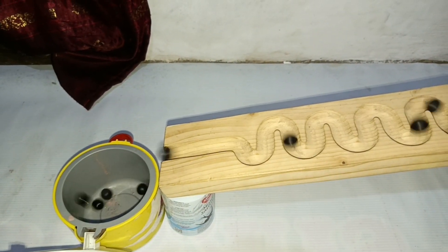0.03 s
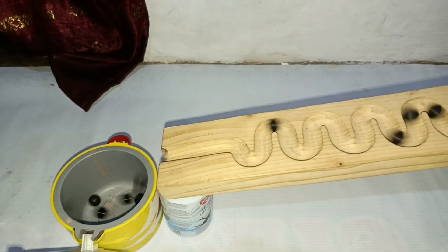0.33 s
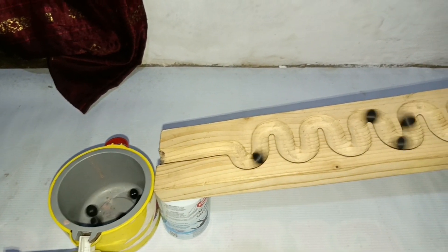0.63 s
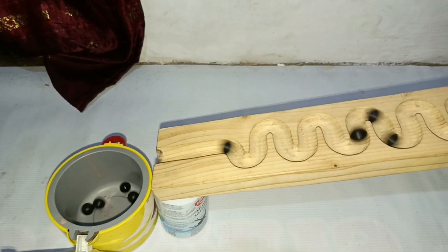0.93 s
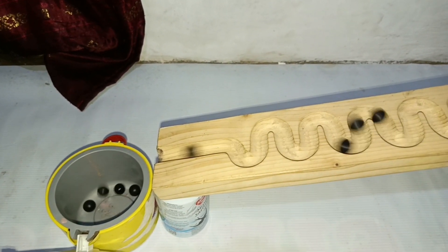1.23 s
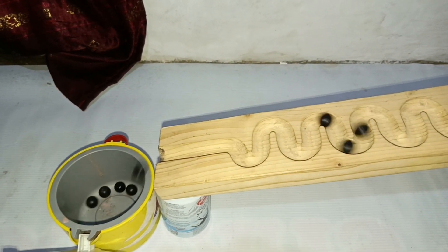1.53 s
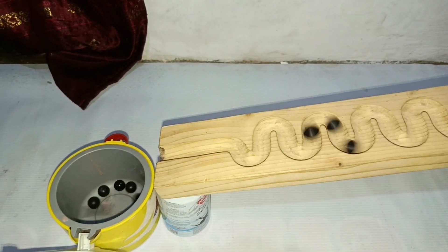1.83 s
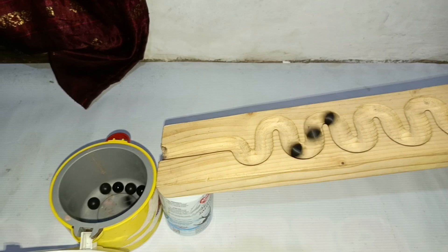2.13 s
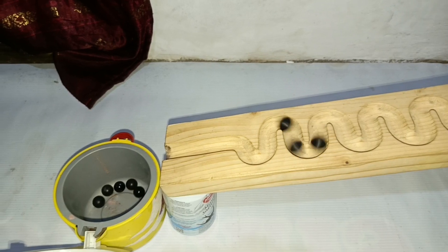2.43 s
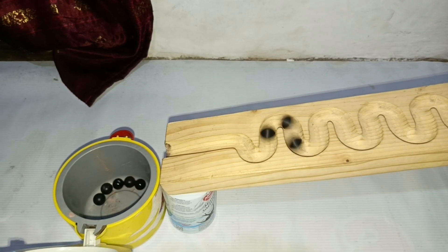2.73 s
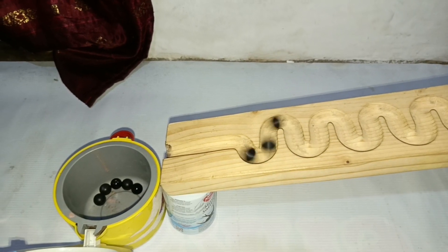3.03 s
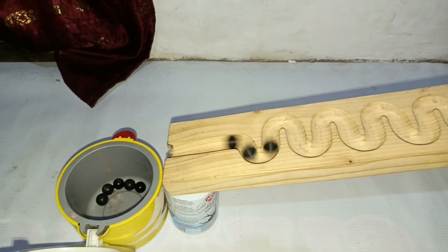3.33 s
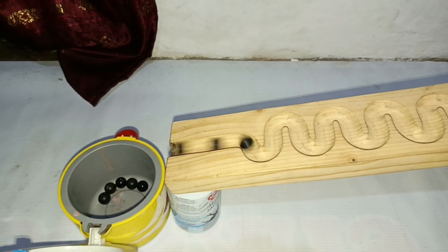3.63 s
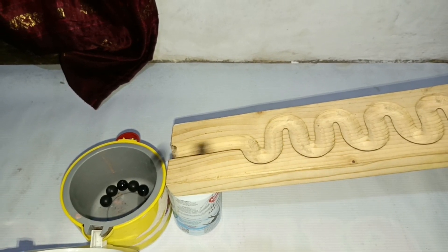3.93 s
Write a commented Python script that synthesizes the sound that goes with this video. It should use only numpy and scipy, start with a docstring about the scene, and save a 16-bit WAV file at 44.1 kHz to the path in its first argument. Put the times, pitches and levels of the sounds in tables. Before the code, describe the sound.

Marbles rumble down a wooden groove and drop into a pot, thumping and clacking.

```python
"""In a small room, glass marbles roll down a winding groove in a wooden board and drop into a pot.
The wood grain shakes them, so the board rumbles, and it knocks when they hit a bend. At each bounce
the pot's base thumps and its wall clacks. The marbles inside circle, rattle and click together.
Near the end, one marble gathers speed on the last straight and whirrs."""
import sys
import numpy as np
from scipy import signal
from scipy.fft import rfft, irfft
from scipy.io import wavfile
from scipy.ndimage import uniform_filter1d

SR = 44100
rng = np.random.default_rng(int(sys.argv[2]) if len(sys.argv) > 2 else 0)


def store_pcm(level_fs):
    """Save levels as 16-bit WAV."""
    pcm = np.round(np.clip(level_fs, -1, 1) * 32767).astype(np.int16)
    wavfile.write(sys.argv[1], SR, np.atleast_2d(pcm).T)


N = 176400
T = np.arange(int(.25 * SR)) / SR  # the clock for one hit, in seconds

# Levels in the tables are relative. A fade_s is the time a sound takes to fall by 60 dB.
# How loudly the marbles roll in the groove: time_s, level_db
GROOVE_LEVELS = [(0, -36), (1.2, -36.5), (1.9, -39), (2.35, -27.5), (2.7, -30), (3.0, -36), (3.75, -34.5),
                 (3.87, -32), (4.0, -33.5)]
# Each new marble stirs up those in the pot, then they settle: time_s, rumble_db, grit_db, fizz_db
CIRCLING_LEVELS = [(0, -19.5, -43.5, -46), (.5, -17, -53, -48.5), (.85, -19, -44, -45),
                   (1.05, -21.5, -50, -72), (1.42, -23, -67.5, -71), (1.53, -23.5, -47.5, -45.5),
                   (1.78, -30, -62, -86), (1.92, -23.5, -53.5, -42.5), (2.2, -14.5, -44.5, -54),
                   (2.42, -25, -57.5, -44.5), (2.6, -33, -53, -66.5), (3.05, -33.5, -71, -79.5),
                   (4.0, -54, -66.5, -70.5)]
# The whirr on the last straight: time_s, level_db
WHIRR_LEVELS = [(3.4, -82.5), (3.8, -54), (3.88, -35.5), (4.0, -51)]
# Brief dips in all the rolling: middle_s, depth_db
ROLLING_DIPS = [(0.154, 16), (0.52, 39), (1.833, 19)]
# Bounces in the pot: start_s, thump_db, clack_db, tick_db
POT_BOUNCES = [(0.059, -33, -21.5, -32.5), (0.1615, 0, -14.5, -31.5), (0.288, -5.5, -16.5, -44),
               (0.328, -6, -16, -34), (0.365, -4, -24, -66.5), (0.402, -11, -18, -38.5),
               (0.469, -9.5, -17.5, -43.5), (0.477, -7.5, -16, -44), (0.529, 1.5, -21.5, -20),
               (0.549, -6, -21, -35.5), (0.643, -23, -26, -44.5), (0.708, 2, -12, -28.5),
               (0.787, -2.5, -31.5, -54), (0.809, -1, -13.5, -28), (0.9673, 6, -12, -37.5),
               (1.021, -10.5, -25, -65.5), (1.036, -15.5, -24.5, -51), (1.211, -14.5, -30, -62),
               (1.231, -7, -25.5, -60.5), (1.335, -2.5, -26, -60), (1.384, -7.5, -32, -53.5),
               (1.422, -12.5, -46, -62.5), (1.547, -9, -24, -51), (1.609, -14.5, -45, -43.5),
               (1.781, -11.5, -29, -69), (1.849, 4, -18.5, -22), (1.898, -12, -22, -35.5),
               (2.006, -19.5, -18, -27.5), (2.03, -1.5, -17, -30.5), (2.102, -4.5, -16.5, -35),
               (2.134, -13.5, -24, -46), (2.181, -5, -22.5, -52), (2.234, -6, -22.5, -54.5),
               (2.265, -13, -31, -60.5), (2.347, -10, -23, -40.5), (2.5348, 1.5, -21, -44.5),
               (2.57, -4, -27.5, -52.5), (2.664, -8, -28, -61), (2.822, -6.5, -23, -54),
               (2.851, -6.5, -42.5, -67.5), (2.946, -4, -27, -67), (2.97, -11.5, -45, -84.5),
               (3.182, -13, -42, -72.5), (3.3671, -5.5, -31, -65), (3.39, -7.5, -31.5, -71),
               (3.441, -9, -32.5, -69)]
# Marble against marble: start_s, level_db
MARBLE_CLICKS = [(0.181, -28), (0.25, -17), (0.4938, -23), (0.869, -24.5), (1.5031, -18.5), (1.59, -24.5),
                 (1.806, -19.5), (2.0052, -22.5), (2.3096, -21.5), (2.346, -16), (2.3964, -25.5),
                 (2.7505, -25), (2.8672, -31.5), (2.916, -30.5)]
# Marble against a bend in the groove: start_s, hum_db, crack_db
BEND_KNOCKS = [(1.132, -32, -22), (1.521, -16.5, -31.5), (2.615, -18, -27.5), (2.72, -22.5, -47.5),
               (3.17, -17, -24), (3.281, -21.5, -48), (3.4805, -18, -26.5), (3.538, -24, -34),
               (3.603, -38, -29), (3.718, -18, -27.5), (3.814, -10.5, -23.5)]

# The tones that ring in the board, the pot's wall and the whirr: pitch_hz, level_db, fade_s
BOARD_TONES = [(420.6, -6, 0.17), (729.1, 1, 0.12), (747.2, 3.5, 0.11), (1147.4, -1.5, 0.074),
               (1197, -11.5, 0.17), (1818, -17.5, 0.05), (2400, -30, 0.21)]
WALL_TONES = [(1072, 7, 0.082), (1220, 5, 0.035), (1591, -5, 0.066), (1788, -5.5, 0.071), (2234, 2, 0.05)]
WHIRR_TONES = [(1110, 9, 0.016), (2010, 9, 0.0057), (3380, -7.5, 0.017), (4170, -12, 0.008)]

# The colour of each noise, or how strong it is from low to high: pitch_hz, level_db
GROOVE_COLOUR = [(90, 10.5), (210, 5), (400, 19), (600, -1), (800, -1), (1250, -10), (1450, -22),
                 (2400, -16.5), (2900, -38.5), (6000, -64.5)]
RUMBLE_COLOUR = [(60, -55.5), (130, -16.5), (200, -7.5), (250, -1), (335, 2.5), (420, -1), (560, -16.5),
                 (900, -22), (1500, -36.5), (3000, -69)]
GRIT_COLOUR = [(400, -16.5), (800, -6.5), (1150, 14.5), (1850, 7.5), (2700, 0), (3200, 1.5), (4000, -7.5),
               (4700, -2.5), (5600, -21.5), (8500, -35)]
FIZZ_COLOUR = [(3000, -4), (4800, -1), (6500, -18.5), (7350, -1.5), (8400, -9)]
ROOM_COLOUR = [(25, -43), (57, 9), (110, 3.5), (200, 7), (1000, -30.5), (15000, -55)]
CLACK_COLOUR = [(90, -22.5), (300, -2), (520, 12), (800, -1.5), (2200, -9.5), (3300, -14), (4200, -20),
                (8500, -42)]
TICK_COLOUR = [(1500, -12), (2600, -9.5), (3300, 3), (4900, -7), (5800, -17.5), (6800, -13), (7500, -3.5),
               (8500, -5.5)]
GLASS_COLOUR = [(1500, -59.5), (2300, -4.5), (3100, 3), (4100, 0.5), (4900, -1.5), (5700, -14.5),
                (6800, -8.5), (7400, 1), (8500, -10)]
CRACK_COLOUR = [(400, 4), (1300, 2), (2450, -13), (2900, -27.5), (6000, -44.5)]


def amp(db):
    """Turns decibels into a number to multiply a sound by."""
    return 10 ** (np.asarray(db) / 20)


def unit(x):
    """Scales a sound to an average power of 1."""
    return x / np.sqrt(np.mean(x ** 2) + 1e-20)


def unit_hit(x):
    """Gives a hit the energy of 10 ms of sound at power 1."""
    return x / np.sqrt(np.sum(x ** 2) / (SR / 100) + 1e-20)


def add(mix, start_s, sound):
    """Mixes a sound in at its start time."""
    part = mix[max(round(start_s * SR), 0):][:len(sound)]
    part += sound[:len(part)]


def colour(x, points):
    """Turns the lows and highs of a sound up or down to follow a colour table."""
    size = 4096
    hz, db = np.transpose(points)
    grid_hz = abs(np.fft.fftfreq(size, 1 / SR)) + 1
    log_gain = np.log(amp(np.interp(np.log(grid_hz), np.log(hz), db)))
    response = np.exp(np.conj(signal.hilbert(log_gain)))  # nothing sounds before its hit
    taps = np.fft.ifft(response).real[:size // 2]
    return signal.fftconvolve(x, taps)[:len(x)]


def level(rows, column=1):
    """A volume curve that glides through one decibel column of a table."""
    rows = np.array(rows)
    return amp(np.interp(np.arange(N) / SR, rows[:, 0], rows[:, column]))


def ring(tones, scatter_db=0, detune=0.018):
    """Fading tones whose strength and exact pitch depend on where the marble lands."""
    out = np.zeros(len(T))
    for hz, db, fade_s in tones:
        fade = amp(db + scatter_db * rng.standard_normal() - 60 * T / fade_s)
        sign = rng.choice([-1, 1])
        pitch_hz = hz * (1 + detune * rng.uniform(-0.91, 1))
        out += fade * sign * np.sin(2 * np.pi * pitch_hz * T)
    return out


def rise(rise_s=0.0011):
    """A quick fade-in for the start of a hit."""
    return 1 - np.exp(-T / rise_s)


def burst(points, fade_s, tail_db=-np.inf, tail_fade_s=np.inf):
    """Many close tones blur into a quick crack of noise, with a weaker tail if asked for."""
    fade = amp(-60 * T / fade_s) + amp(tail_db - 60 * T / tail_fade_s)
    return unit_hit(colour(rng.standard_normal(len(T)) * fade, points))


def bumps(per_s, spread_db):
    """Tiny random hits of marbles on an uneven surface."""
    size = amp(spread_db * np.minimum(rng.exponential(1, N), 4))
    return size * rng.choice([-1, 1], N) * (rng.random(N) < per_s / SR)


def flutter(rate_hz, depth_db):
    """Unsteady contact makes the volume waver at random."""
    slow_noise = rfft(rng.standard_normal(N)) / (1 + (np.fft.rfftfreq(N, 1 / SR) / rate_hz) ** 4)
    return amp(depth_db * unit(irfft(slow_noise, N)))


def board_rolling(rumble_db=2, cutoff_hz=1000):
    """The wood grain shakes the marbles, which drum on the board and make it ring."""
    shaking = bumps(per_s=5200, spread_db=3.5) * flutter(rate_hz=5.7, depth_db=4.5)
    soft_shaking = signal.lfilter(*signal.butter(2, cutoff_hz, fs=SR), shaking)
    ringing = unit(signal.fftconvolve(soft_shaking, ring(BOARD_TONES))[:N])
    rumble = unit(colour(shaking[::-1], GROOVE_COLOUR))  # reversed, so it wavers apart from the ring
    return (ringing + amp(rumble_db) * rumble) * level(GROOVE_LEVELS)


def pot_rolling(grit_db=10, fizz_db=1):
    """Marbles circle on the pot's rough base: a low rumble with grit and fizz on top."""
    sway = flutter(rate_hz=15, depth_db=1.5)
    roll = sway * bumps(per_s=5400, spread_db=1)
    scrape = sway * bumps(per_s=1700, spread_db=0)
    rumble = unit(colour(roll, RUMBLE_COLOUR)) * level(CIRCLING_LEVELS, column=1)
    grit = unit(colour(scrape, GRIT_COLOUR)) * level(CIRCLING_LEVELS, column=2)
    fizz = unit(colour(scrape, FIZZ_COLOUR)) * level(CIRCLING_LEVELS, column=3)
    return rumble + amp(grit_db) * grit + amp(fizz_db) * fizz


def room_echo(x, echo_db=-17, fade_s=0.82, cutoff_hz=3000):
    """The room adds a short, dull tail of scattered echoes."""
    t = np.arange(SR // 2) / SR
    echoes = rng.choice([-1, 1], len(t)) * (rng.random(len(t)) < 2000 / SR)  # about 2000 a second
    echoes = echoes * (t > .006) * amp(-60 * t / fade_s)
    tail = signal.lfilter(*signal.butter(1, cutoff_hz, fs=SR), echoes / np.linalg.norm(echoes))
    return x + amp(echo_db) * signal.fftconvolve(x, tail)[:N]


def room_rumble(level_db=-43.5):
    """The low, steady background noise of the room."""
    return amp(level_db) * unit(colour(rng.standard_normal(N), ROOM_COLOUR))


def base_thump(start_s, base_hz=327.6, drift_hz_per_s=6, rise_s=0.0047, overtone_db=-12):
    """The pot's base swells into a low thump whose fade differs a little from hit to hit."""
    hz = (base_hz + drift_hz_per_s * start_s) * (1 + .03 * rng.standard_normal())
    fade_s = .048 * np.exp(.25 * rng.uniform(-0.16, 1))
    main_tone = np.sin(2 * np.pi * hz * T)
    overtone = amp(overtone_db) * np.sin(2 * np.pi * (1.15 * hz * T + rng.random()))
    swell = 1 - np.exp(-(T / rise_s) ** 2)
    return unit_hit((main_tone + overtone) * swell * amp(-60 * T / fade_s))


def chatter(x, typical_gap_s=.004, repeat_db=-4):
    """The springy base meets the marble again just after the first touch."""
    delay = round(typical_gap_s * (.5 + rng.random()) * SR)
    return x + amp(repeat_db) * np.pad(x, (delay, 0))[:len(x)]


def soften(x, strength_db, full_strength_hz, db_per_octave):
    """A lighter touch lasts longer, so it loses more of its high notes."""
    cutoff_hz = min(full_strength_hz * 2 ** (strength_db / db_per_octave), SR / 3)
    return signal.lfilter(*signal.butter(3, cutoff_hz, fs=SR), x)


def pot_bounces(thump_gain_db=-1, clack_gain_db=1, ring_db=-5):
    """A marble lands in the pot: the base thumps, the wall clacks and the spot it hits ticks."""
    out = np.zeros(N)
    for start_s, thump_db, clack_db, tick_db in POT_BOUNCES:
        thump = amp(thump_db + thump_gain_db) * base_thump(start_s)
        ringing = amp(ring_db) * unit_hit(ring(WALL_TONES, scatter_db=7.5, detune=.04))
        wall = burst(CLACK_COLOUR, fade_s=.045, tail_db=-31, tail_fade_s=0.22) + ringing
        wall = soften(chatter(wall), tick_db, full_strength_hz=10100, db_per_octave=29.8)
        clack = amp(clack_db + clack_gain_db) * unit_hit(wall)
        tick = amp(tick_db) * burst(TICK_COLOUR, fade_s=0.04, tail_db=-10.5, tail_fade_s=0.034)
        add(out, start_s, thump + clack + tick)
    return out


def glass_clicks(gain_db=-8):
    """Glass hits glass with a short, bright click."""
    out = np.zeros(N)
    for start_s, db in MARBLE_CLICKS:
        click = burst(GLASS_COLOUR, fade_s=0.034)
        click = soften(click, db, full_strength_hz=18600, db_per_octave=12.2)
        add(out, start_s, amp(db + gain_db) * click)
    return out


def board_knocks():
    """A marble meets a bend and rings the board: a head-on hit cracks, a glancing one only hums."""
    out = np.zeros(N)
    for start_s, hum_db, crack_db in BEND_KNOCKS:
        hum = unit_hit(ring(BOARD_TONES) * rise())
        crack = burst(CRACK_COLOUR, fade_s=0.071) * rise()
        add(out, start_s, amp(hum_db) * hum + amp(crack_db) * crack)
    return out


def marble_whirr():
    """A marble gathers speed on the last straight, and its tiny bumps swell into a whirr."""
    shaking = bumps(per_s=850, spread_db=2.5)
    whirr = signal.fftconvolve(shaking, ring(WHIRR_TONES) * rise())[:N]
    return unit(whirr) * level(WHIRR_LEVELS)


def scene(dip_width_s=0.0078):
    """Rolling, bounces, clicks and knocks in a small room with a low, steady rumble."""
    t = np.arange(N) / SR
    dips_db = sum(db * np.exp(-((t - middle_s) / dip_width_s) ** 2) for middle_s, db in ROLLING_DIPS)
    rolling = amp(-dips_db) * (board_rolling() + marble_whirr() + pot_rolling())
    marbles = rolling + pot_bounces() + glass_clicks() + board_knocks()
    return (room_echo(marbles) + room_rumble())[None]


def low_pass(x, hz):
    """Sharply cuts everything above the given pitch."""
    taps = signal.firwin(511, hz, window=("kaiser", 9), fs=SR)
    return signal.oaconvolve(x, taps[None], "same")


def record(dry, low_hz=44.6, high_hz=8560, leak_db=-40, limit_db=-1, recover_db_per_s=200, knee=.8):
    """A microphone loses the extreme lows and highs; a quick limiter turns down the hardest thumps."""
    x = low_pass(dry, high_hz) + amp(leak_db) * dry
    x = signal.lfilter(*signal.butter(4, low_hz, "high", fs=SR), x)
    fall_db = np.arange(N) * recover_db_per_s / SR
    level_db = 20 * np.log10(abs(x[0]) + 1e-9)
    peak_db = np.maximum.accumulate(level_db + fall_db) - fall_db  # jumps to each peak, then sinks
    x = x / amp(uniform_filter1d(np.maximum(peak_db - limit_db, 0), size=130))
    over = np.maximum(abs(x) - knee, 0)  # whatever still sticks out above the knee gets rounded off
    rounded = np.sign(x) * (abs(x) - over + (1 - knee) * np.tanh(over / (1 - knee)))
    return low_pass(rounded, hz=15500)


dry = scene()
out = record(dry)
store_pcm(out)
```